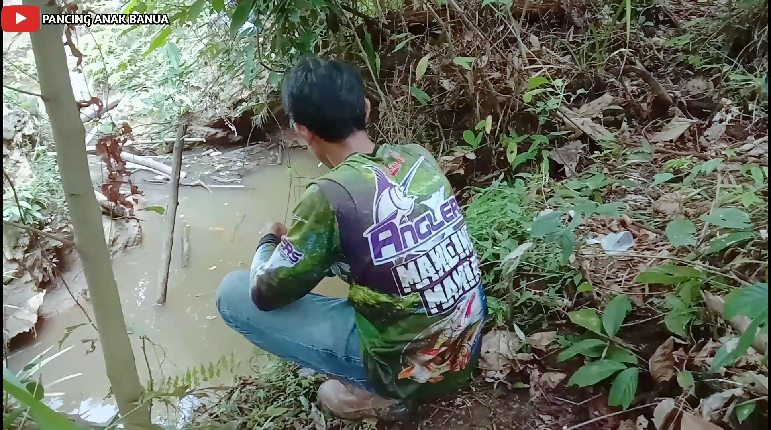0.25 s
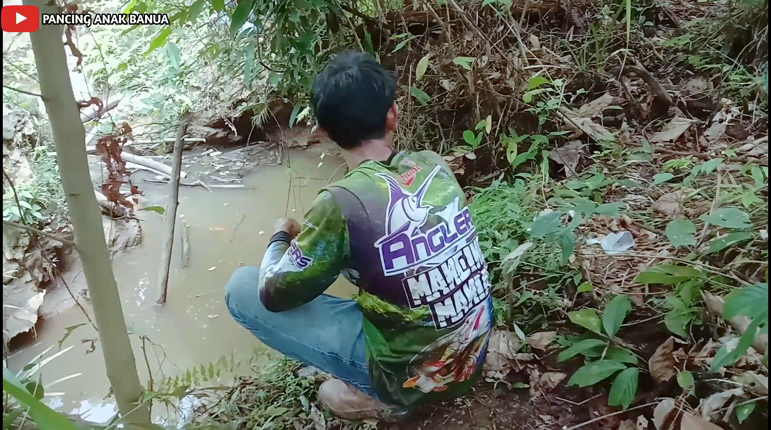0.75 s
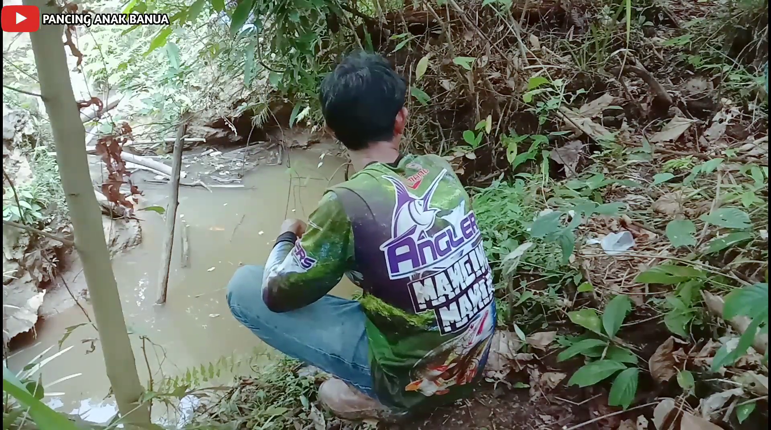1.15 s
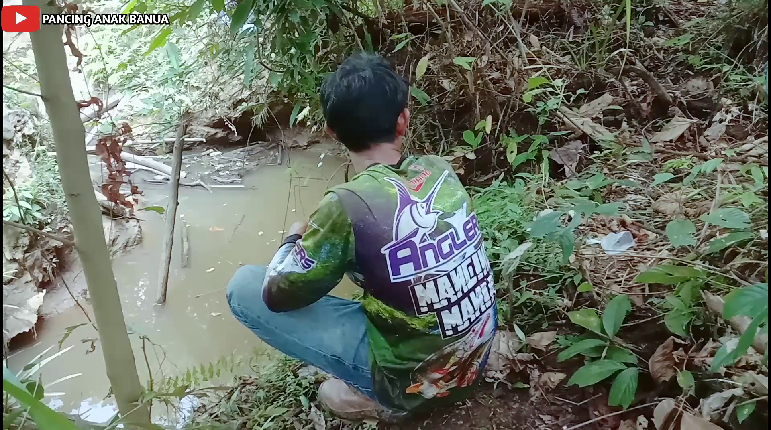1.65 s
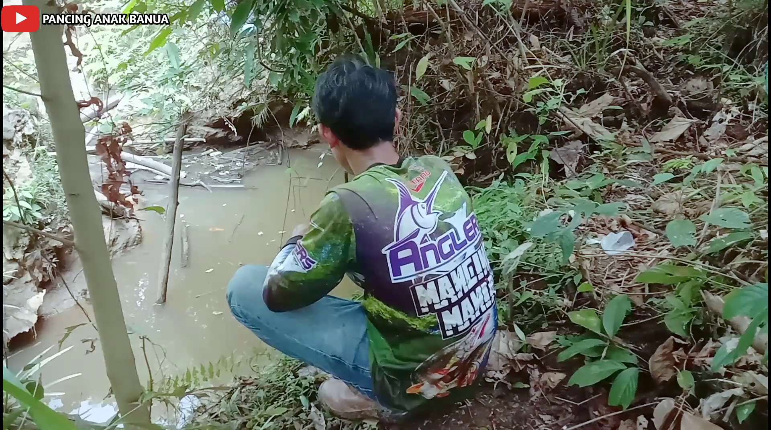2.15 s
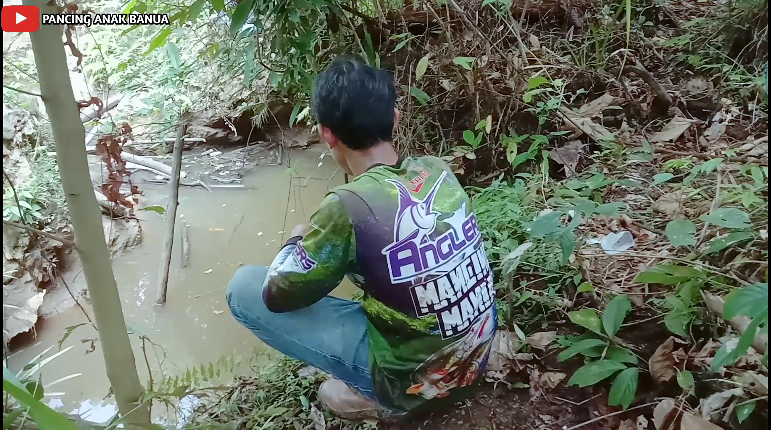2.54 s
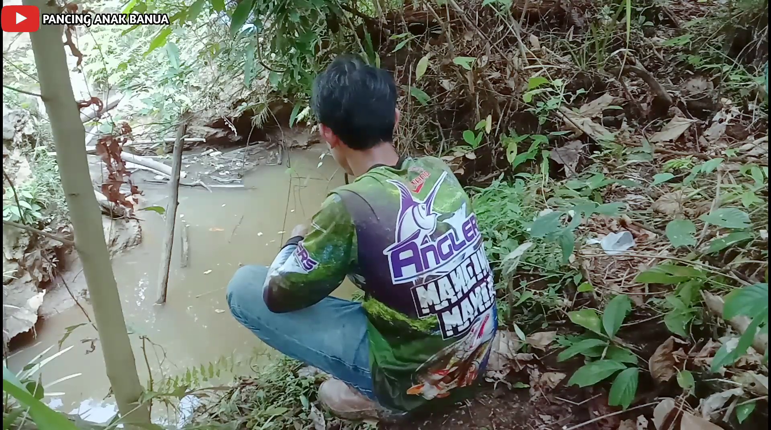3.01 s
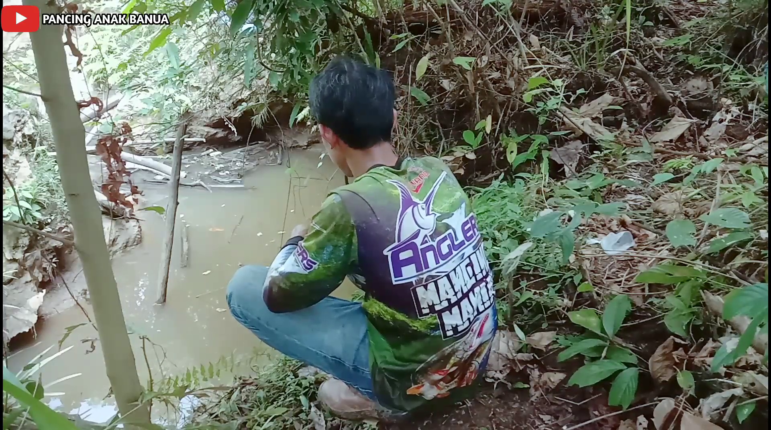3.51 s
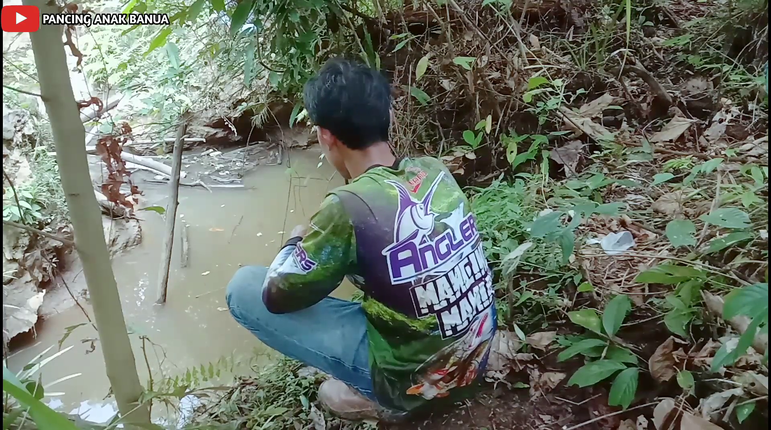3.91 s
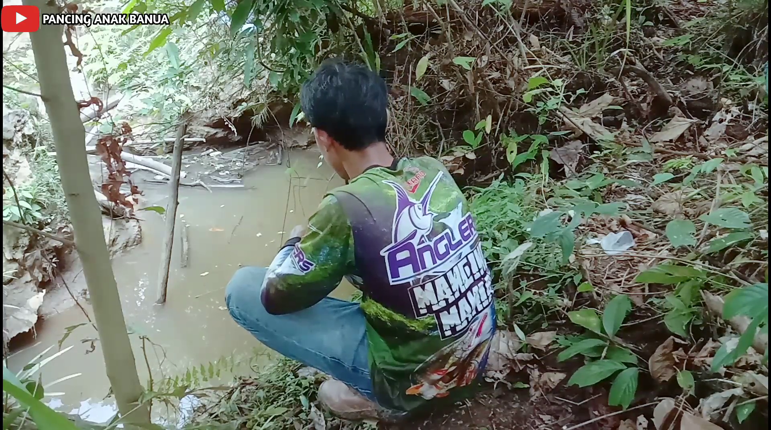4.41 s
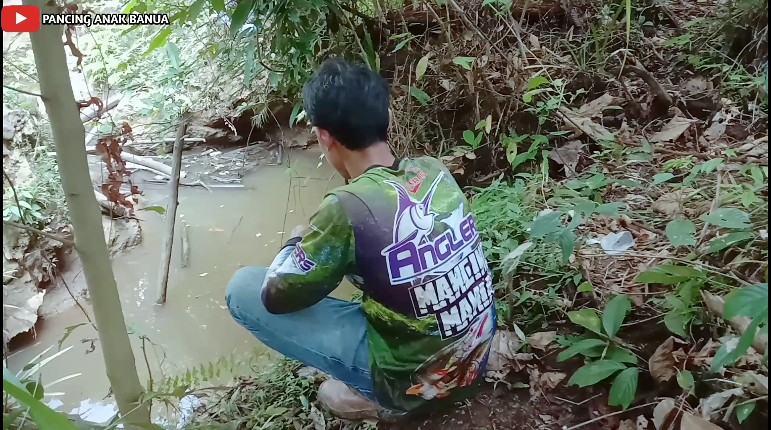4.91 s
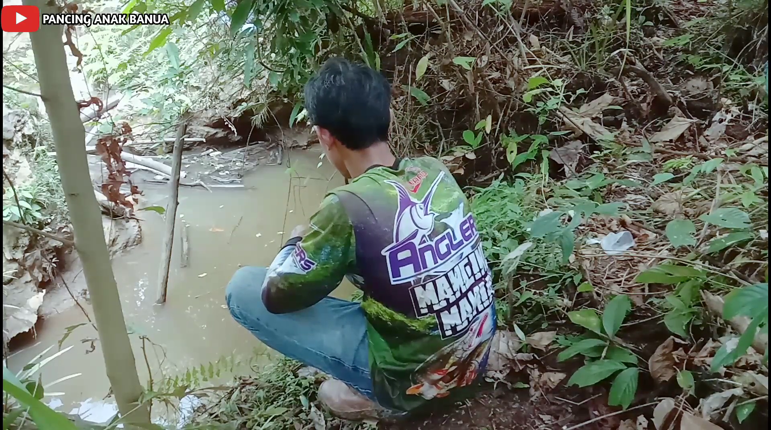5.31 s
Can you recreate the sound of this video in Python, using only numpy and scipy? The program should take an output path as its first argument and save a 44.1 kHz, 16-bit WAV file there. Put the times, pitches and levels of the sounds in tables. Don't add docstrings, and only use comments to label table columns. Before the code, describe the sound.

Outdoors by a wooded stream, a dense high cicada drone runs throughout at a constant level. A sharp twig snap and a short dry leaf rustle open the scene close to the microphone. About a second in, a nearer caller slides up to a held note and breaks into a buzzy warble. Faint chirps, a tiny bird peep and a plop follow, then a louder second call at the end. Small camera microphone with soft air hiss.

```python
import sys
import numpy as np
from scipy import signal
from scipy.fft import rfft, irfft, next_fast_len
from scipy.io import wavfile
from scipy.ndimage import uniform_filter1d

SR = 44100
rng = np.random.default_rng(int(sys.argv[2]) if len(sys.argv) > 2 else 0)


def persist_wave(psi):
    counts = np.round(np.clip(psi, -1, 1) * 32767).astype(np.int16)
    wavfile.write(sys.argv[1], SR, np.atleast_2d(counts).T)


def invert_db(level):
    return 10 ** (np.asarray(level, dtype=float) / 20)


N = 245186

# frequency in Hz, level in dB per Hz.
AIR_SPECTRUM = [(12, -28), (25, -16.5), (50, -12.5), (80, 0.5), (170, -2), (300, -7), (1000, -14),
                (1500, -15.5), (4300, -20), (5700, -15.5), (8000, -34), (9300, -58.5), (12000, -67.5)]
AIR_SIDE_SPECTRUM = [(12, -39), (20, -15.5), (133, -7), (1040, -11.5), (1250, -4.5), (1440, -10),
                     (5990, -16), (7250, -22.5), (9540, -40), (12200, -16.5), (14000, -35.5)]
AIR_DB, AIR_SIDE_DB, GUST_DB = -65.5, -73, 1.6
# frequency in Hz, level in dB per Hz.
TREETOP_SPECTRUM = [(7800, -23), (8500, 12.5), (9500, -7.5), (10500, -7), (11500, -2.5), (12200, -24.5)]
TREETOP_DB = -74
# start in seconds, length in seconds, level in dB.
DRONE_SWELLS = [
    (1.95, .13, -73),
    (2.3, .15, -81.5),
    (2.57, .04, -70),
]
# rise, fade and fall in dB per second.
DRONE_SLOPES = (38, 0.92, 150)
# centre in Hz, width in Hz.
DRONE_BODY = (150, 28)
# frequency in Hz, level in dB per Hz.
CICADA_SPECTRUM = [(5200, -51), (5500, -35.5), (5850, -30.5), (6070, -23.5), (6320, -10), (6560, -0.5),
                   (6730, 2.5), (7040, 2), (7250, 1.5), (7470, -6), (7750, -17.5), (8060, -29), (8800, -37),
                   (9300, -50)]
CICADA_DB = -37.3
# frequency in Hz, level in dB per Hz.
KATYDID_SPECTRUM = [(10800, -51.5), (11400, -41), (12400, -30), (12700, -24.5), (13600, -19), (14100, -6),
                    (14600, -3), (15100, -2.5), (15400, -0.5), (15700, -7.5)]
KATYDID_DB = -54.5
# resonance in Hz, width in Hz.
KATYDID_WING = (15150, 510)
# time in seconds, level in dB, stroke lag in cycles.
KATYDID_STROKES = [(0, -60, 0.17), (.6, -56.5, .28), (1.5, -60, 0.39), (2.3, -58, 0.34), (2.9, -59.5, .36),
                   (3.3, -59.5, 0.37), (4, -61, 0.62), (4.5, -54.5, .62), (4.8, -61.5, 0.91),
                   (5.05, -58.5, 1.22), (5.56, -59.5, 1.24)]
STROKE_HZ = 19.5
# start in seconds, length in seconds, level in dB.
CRICKET_BOUTS = [
    (2.14, .6, -69),
    (2.83, .3, -72.5),
    (3.23, 0.25, -71.5),
    (3.58, 0.36, -73.5),
]
# rise, fade and fall in dB per second.
CRICKET_SLOPES = (160, 3.8, 150)
# resonance in Hz, width in Hz.
CRICKET_WING = (5060, 120)
# start in seconds, length in seconds, level in dB.
WHISTLER_BOUTS = [
    (1.77, 0.046, -60.5),
    (1.9, .11, -60),
    (2.075, 0.021, -67),
]
# rise, fade and fall in dB per second.
WHISTLER_SLOPES = (300, 28, 250)
# resonance in Hz, width in Hz.
WHISTLER_WING = (5500, 140)
# start in seconds, length in seconds, level in dB.
FROG_CROAKS = [(.205, .01, -62), (.345, 0.029, -54.5), (.46, 0.043, -57), (.66, 0.026, -60),
               (.82, 0.047, -69), (1.52, .04, -78), (1.74, 0.065, -78), (1.89, .05, -76),
               (2.21, .07, -72.5), (2.41, 0.057, -72.5), (2.6, 0.026, -74), (2.77, .05, -81),
               (3.14, .08, -68.5), (3.36, .02, -82), (3.53, 0.023, -69), (3.84, 0.034, -77),
               (3.96, 0.018, -79), (4.05, 0.024, -76), (4.27, 0.11, -71.5), (4.72, 0.091, -76),
               (4.86, .05, -68), (5.16, 0.045, -74), (5.28, .04, -77), (5.43, 0.049, -74.5)]
# rise, fade and fall in dB per second.
FROG_SLOPES = (600, 54, 320)
# resonance in Hz, width in Hz.
FROG_SAC = (1265, 77)
MURMUR_DB = -78.5
# start in seconds, peak level in dB, pitch in Hz.
PLOPS = [
    (2.504, -61.5, 424),
    (3.374, -67.5, 910),
    (5.068, -71, 907),
    (5.19, -70, 900),
]
PLOP_S = 0.033
# start in seconds, peak level in dB, pitch in Hz, glide in Hz, length in seconds.
PEEPS = [
    (2.614, -54.5, 2260, -1, 0.015),
    (2.605, -65, 1920, 0, 0.021),
    (2.63, -58.5, 2290, 349, 0.019),
    (2.645, -68, 2190, 57, 0.018),
    (2.649, -62, 2630, 0, 0.025),
    (2.7, -78, 2660, 38.5, .07),
]
# start in seconds, length in seconds, level in dB, bass level in dB.
LEAF_SHUFFLES = [
    (0.177, 0.0047, -47.5, -0.5),
    (0.329, 0.079, -45, -14.5),
    (.43, 0.028, -52.5, -7),
    (0.471, 0.04, -48, -14),
    (0.552, 0.046, -61, -2),
    (0.617, 0.097, -49.5, -21),
    (0.737, 0.11, -69, -3),
]
# rise, fade and fall in dB per second.
LEAF_SLOPES = (1200, 88, 620)
# frequency in Hz, level in dB per Hz.
LEAF_SPECTRUM = [(150, -33), (250, -26.5), (900, -21), (1400, -17.5), (3000, -11), (5200, -14), (6000, -24),
                 (8300, -25.5), (14000, -38)]
# frequency in Hz, level in dB, t60 in seconds.
TWIG_MODES = [(700, -4.5, 0.15), (1174, -2, 0.14), (2610, -11.5, 0.19), (2910, -10, 0.21),
              (3470, -3.5, 0.21), (3640, -3, 0.2), (3770, -6, 0.089), (4280, -13, 0.1), (4830, -13, 0.05)]
# start in seconds, peak level in dB, bass share in dB, ring length as a share.
CRACKS = [(0.1572, -43.5, -23, 0.37), (.1703, -23.5, -5, 0.14), (.1718, -24, -8, 0.4),
          (.1775, -32, -5, 0.38), (.1835, -31, -11, 0.28), (.198, -41, -10, 0.93), (.332, -49, -4, .3),
          (0.471, -53.5, 6, 0.25), (0.4943, -37, 8, 0.21), (.593, -43.5, -24, 0.36), (0.616, -50, -16, .3)]
RING_SHARE = .19
# resonance in Hz, width in Hz, level in dB, t60 in seconds.
TWIG_HUM = (3740, 330, -48, .28)
# time in seconds, effort level in dB.
CALL_EFFORT = [
    [(1.11, -77), (1.135, -55), (1.18, -53.5), (1.29, -51), (1.31, -65), (1.34, -58.5)],
    [(4.85, -90), (4.862, -50), (4.9, -48.5), (4.93, -44.5), (5.0, -44), (5.06, -49), (5.09, -70),
     (5.12, -60)],
]
# harmonic number, level in dB against the 6th at full effort,
# extra dB lost per dB of slack.
CALL_HARMONICS = [
    [(2, -26, 0), (3, -20.5, 0), (4, -6.5, 0.9), (5, -7.5, 0), (6, -2, -0.5), (7, -9, 0)],
    [(2, -21, 0), (3, -25.5, -.4), (4, -21, -1.14), (5, -9, .4), (6, -0.5, 1), (7, -17, -.75)],
]
CALL_ROUGHNESS = [.7, .22]
CALL_START_HZ = [786, 813]
HOLD_HZ, SLIDE_S = 850, .1
# start in seconds, length in seconds, pitch in Hz, level in dB.
WARBLE_NOTES = [(1.34, .07, 837, -58), (1.42, .04, 812, -61), (1.465, .055, 798, -64),
                (1.53, .03, 818, -63), (1.562, .05, 846, -59), (1.63, .057, 806, -60),
                (1.705, .035, 824, -62), (1.795, .07, 800, -68), (1.883, .03, 826, -65),
                (1.93, .03, 802, -70), (1.972, .048, 825, -64), (2.065, .04, 818, -69),
                (2.12, .035, 797, -75), (5.112, .028, 780, -62), (5.145, .055, 780, -67),
                (5.21, .03, 797, -60), (5.25, .025, 795, -69), (5.28, .022, 826, -61),
                (5.308, .03, 802, -60), (5.372, .03, 824, -61), (5.408, .025, 801, -62),
                (5.465, .03, 802, -67), (5.53, .03, 800, -70)]
# harmonic number, level in dB.
WARBLE_HARMONICS = [(2, -14.5), (3, -24), (4, -3.5), (5, -13), (6, 1), (7, -0.5)]
SAG_HZ_PER_S = 150
# resonance in Hz, width in Hz, level in dB.
BUZZ_STRANDS = [
    (4745, 140, -4.5),
    (5020, 330, 0.5),
]
# start in seconds, length in seconds, level in dB.
BUZZ_BOUTS = [
    (1.3, .8, -59.5),
    (5.1, 0.51, -60.5),
]
# rise, fade and fall in dB per second.
BUZZ_SLOPES = (480, 12, 120)
FOREST_T60_S, FOREST_DB = .33, -2
TOP_HZ = 15530


def level(x, db):
    return x * invert_db(db) / np.sqrt(np.mean(x ** 2))


def track(table, column=1, silent=-140.):
    table = np.array(table)
    return np.interp(np.arange(N) / SR, table[:, 0], table[:, column], left=silent, right=silent)


def colour(x, points):
    hz, db = np.transpose(points)
    size = next_fast_len(len(x))
    f = np.maximum(np.arange(size // 2 + 1) * SR / size, 1)
    gain = invert_db(np.interp(np.log(f), np.log(hz), db, left=-120, right=-120))
    shaped = irfft(rfft(x, size) * gain, size)[:len(x)]
    return level(shaped, 0)


def resonate(x, hz, width):
    b, a = signal.iirpeak(hz, hz / width, fs=SR)
    once = signal.lfilter(b, a, x)
    return level(signal.lfilter(b, a, once), 0)


def walk(rate):
    k = int(SR / rate)
    held = np.repeat(rng.standard_normal(N // k + 1), k)
    return 1.3 * uniform_filter1d(uniform_filter1d(held, k), k)[:N]


def clicks(per_s, spread_db):
    chance = rng.random((3, N))
    present = chance[0] < per_s / SR
    sign = np.sign(chance[1] - .5)
    return present * sign * invert_db(-spread_db * np.log(1 - chance[2]))


def bouts(rows, rise_db, fade_db, fall_db):
    t = np.arange(N) / SR
    return sum(invert_db(db - rise_db * np.maximum(s - t, 0) - fade_db * np.clip(t - s, 0, length)
                   - fall_db * np.maximum(t - s - length, 0)) for s, length, db in rows)


def decay(t, t60):
    return np.exp(-np.log(1000) * t / t60)


def air(spectrum, db):
    hiss = colour(rng.standard_normal(N), spectrum)
    out = hiss.copy()
    for hz in (60, 120, 240, 480):
        edges = [hz / np.sqrt(2), hz * np.sqrt(2)]
        octave = signal.sosfiltfilt(signal.butter(1, edges, "band", fs=SR, output="sos"), hiss)
        out += octave * (invert_db(GUST_DB * walk(14)) - 1)
    return out * invert_db(db)


def treetops():
    return colour(rng.standard_normal(N), TREETOP_SPECTRUM) * invert_db(TREETOP_DB + walk(18))


def drone():
    return resonate(rng.standard_normal(N), *DRONE_BODY) * bouts(DRONE_SWELLS, *DRONE_SLOPES)


def cicadas():
    return colour(clicks(20000, spread_db=1.0), CICADA_SPECTRUM) * invert_db(CICADA_DB + 0.61 * walk(13))


def katydids():
    cycles = STROKE_HZ * np.arange(N) / SR - track(KATYDID_STROKES, column=2)
    stroke = np.exp(1.4 * np.cos(2 * np.pi * cycles))
    near = resonate(stroke * clicks(3000, spread_db=0.0), *KATYDID_WING) * invert_db(track(KATYDID_STROKES))
    far = colour(rng.standard_normal(N), KATYDID_SPECTRUM) * invert_db(KATYDID_DB + walk(14))
    return near + far


def crickets():
    first = resonate(clicks(710, spread_db=1.0), *CRICKET_WING) * bouts(CRICKET_BOUTS, *CRICKET_SLOPES)
    second = resonate(clicks(790, spread_db=4.0), *WHISTLER_WING)
    return first + second * bouts(WHISTLER_BOUTS, *WHISTLER_SLOPES)


def frogs():
    sac = resonate(clicks(300, spread_db=1.0), *FROG_SAC)
    return sac * (invert_db(MURMUR_DB) + bouts(FROG_CROAKS, *FROG_SLOPES))


def short_tones(rows):
    out = np.zeros(N)
    for s, db, hz, glide_hz, length in rows:
        t = np.arange(int(length * SR)) / SR
        i = int(s * SR)
        tone = np.sin(2 * np.pi * (hz + glide_hz * t / length / 2) * t)
        out[i:i + len(t)] += invert_db(db) * np.sin(np.pi * t / length) * tone
    return out


def water():
    return short_tones([(*plop, 0, PLOP_S) for plop in PLOPS])


def bird():
    return short_tones(PEEPS)


def leaves():
    crackle = colour(clicks(3000, spread_db=2.5), LEAF_SPECTRUM) * invert_db(walk(90.4))
    scuff = resonate(clicks(2000, spread_db=1.5), 450, 1000)
    bright_rows = [row[:3] for row in LEAF_SHUFFLES]
    dull_rows = [(s, length, db + bass_db) for s, length, db, bass_db in LEAF_SHUFFLES]
    return crackle * bouts(bright_rows, *LEAF_SLOPES) + scuff * bouts(dull_rows, *LEAF_SLOPES)


def twig():
    out, t = np.zeros(N), np.arange(SR // 4) / SR
    chance = rng.standard_normal((len(CRACKS), len(TWIG_MODES)))
    push = 1 - np.exp(-t / 0.0016)
    for (s, db, bass_db, ring), luck in zip(CRACKS, chance):
        blow = np.zeros(len(t))
        for (hz, mode_db, t60), c in zip(TWIG_MODES, luck):
            gain = invert_db(mode_db + 2 * c + (hz < 1500) * bass_db)
            blow += gain * np.sin(2 * np.pi * hz * t) * decay(t, RING_SHARE * ring * t60)
        blow *= push
        splinters = rng.standard_normal(len(t)) * decay(t, .5 * ring)
        hit = blow + 0.024 * ring * signal.fftconvolve(blow, splinters)[:len(t)]
        i = int(s * SR)
        out[i:i + len(t)] += hit * invert_db(db) / np.abs(hit).max()
    return out


def twig_hum():
    hz, width, db, t60 = TWIG_HUM
    after = np.arange(N) / SR - CRACKS[2][0]
    fade = invert_db(db - 60 * np.maximum(after, 0) / t60)
    return resonate(clicks(1100, spread_db=2.5), hz, width) * (after > 0) * fade


def harmonics(hz, levels, rough):
    phase = 2 * np.pi * np.cumsum(hz * (1 + 0.01267 * rough * walk(150))) / SR
    out = np.zeros(N)
    for k, db in levels:
        gain = invert_db(db + 1.4 * walk(25.06) + 3.6 * rough * walk(70))
        out += np.sqrt(2) * np.sin(round(k) * phase) * gain
    return out


def opening_notes():
    out = np.zeros(N)
    for song, start_hz, voice, rough in zip(CALL_EFFORT, CALL_START_HZ, CALL_HARMONICS, CALL_ROUGHNESS):
        slide = np.clip((np.arange(N) / SR - song[0][0]) / SLIDE_S, 0, 1)
        hz = start_hz + (HOLD_HZ - start_hz) * np.sin(np.pi / 2 * slide) ** 1.3
        effort = track(song)
        slack = np.minimum(effort.max() - effort, 15)
        levels = [(k, effort + db - loss * slack) for k, db, loss in voice]
        out += harmonics(hz, levels, rough)
    return out


def warble():
    hz, gate = np.full(N, 800.), np.zeros(N)
    for s, length, note_hz, db in WARBLE_NOTES:
        i = int(s * SR)
        n = min(int(length * SR), N - i)
        hz[i:i + n] = note_hz - SAG_HZ_PER_S * length * np.linspace(-.5, .5, n)
        gate[i:i + n] = invert_db(db) * signal.windows.tukey(n, .5)
    return gate * harmonics(hz, WARBLE_HARMONICS, .95)


def buzz():
    strands = sum(invert_db(db) * resonate(clicks(1500, spread_db=2.5), hz, width) for hz, width, db in BUZZ_STRANDS)
    return strands * bouts(BUZZ_BOUTS, *BUZZ_SLOPES)


def caller():
    return opening_notes() + warble() + buzz()


def trees(x):
    t = np.arange(SR // 2) / SR
    tail = rng.standard_normal(len(t)) * decay(t, FOREST_T60_S)
    return x + invert_db(FOREST_DB) * signal.fftconvolve(x, tail / np.linalg.norm(tail))[:N]


def scene():
    frog, high = frogs(), katydids()
    near = twig() + twig_hum() + leaves()
    mid = air(AIR_SPECTRUM, AIR_DB) + treetops() + drone() + cicadas() + high + crickets() + frog
    mid += near + trees(water() + bird() + caller())
    side = air(AIR_SIDE_SPECTRUM, AIR_SIDE_DB) + invert_db(-11) * np.roll(frog, 900)
    side += invert_db(-22) * np.roll(near, 40) + invert_db(-32.5) * np.roll(high, 700)
    return np.array([mid + side, mid - side])


def band_limit(x):
    return signal.sosfilt(signal.butter(12, 15530, fs=SR, output="sos"), x)


def record(dry):
    cut = signal.sosfilt(signal.ellip(10, .2, 80, TOP_HZ, fs=SR, output="sos"), dry)
    return band_limit(cut)


dry = scene()
out = record(dry)
persist_wave(out)
```